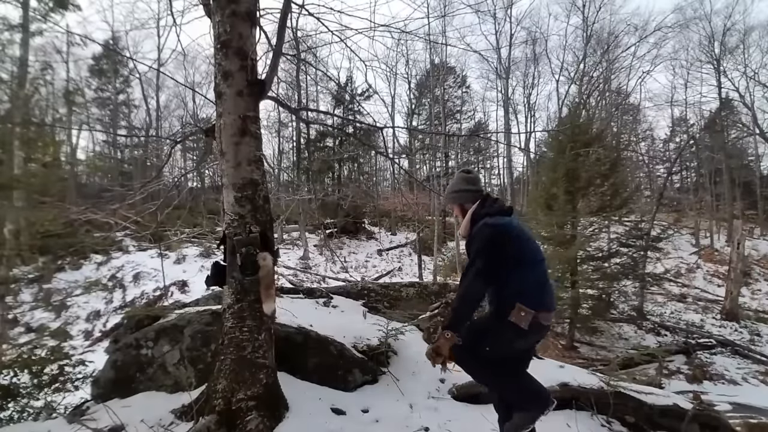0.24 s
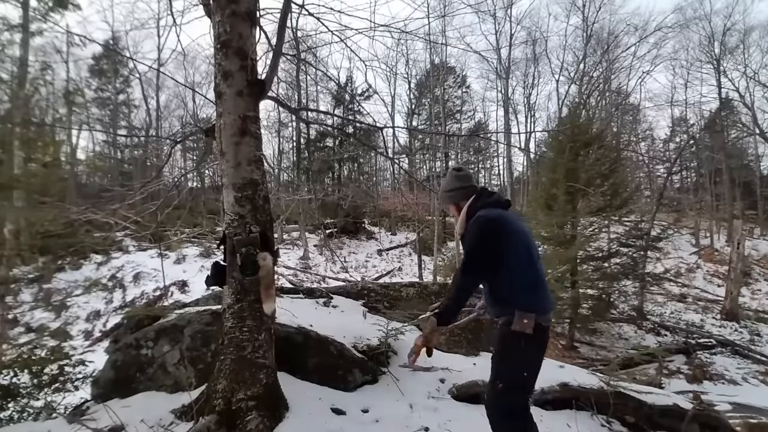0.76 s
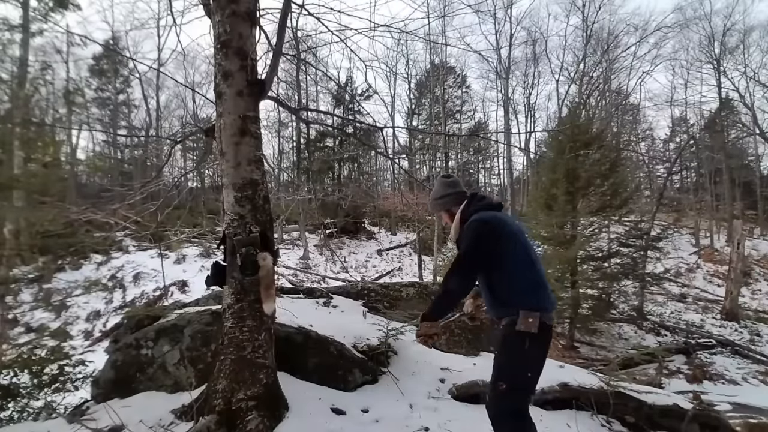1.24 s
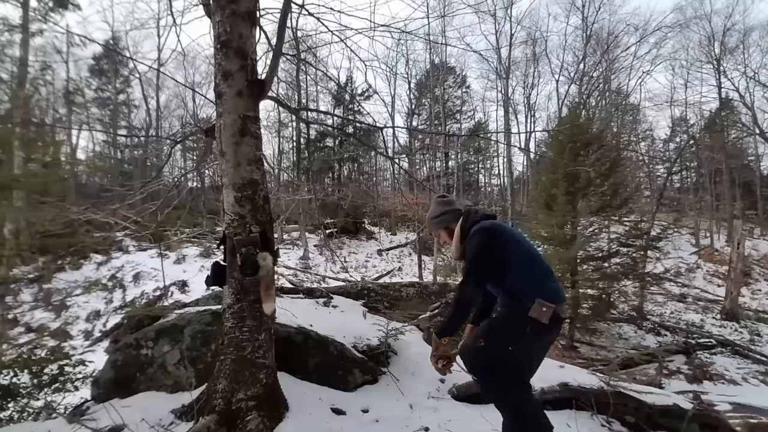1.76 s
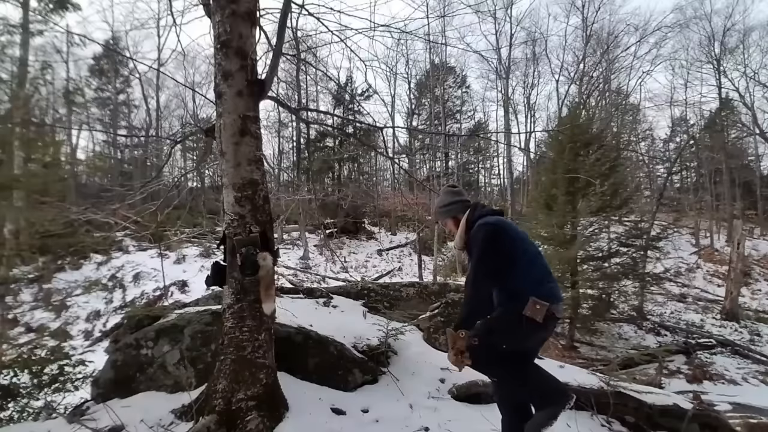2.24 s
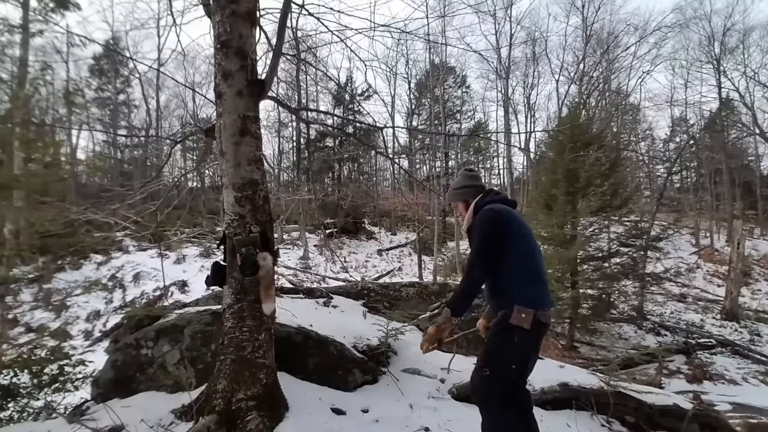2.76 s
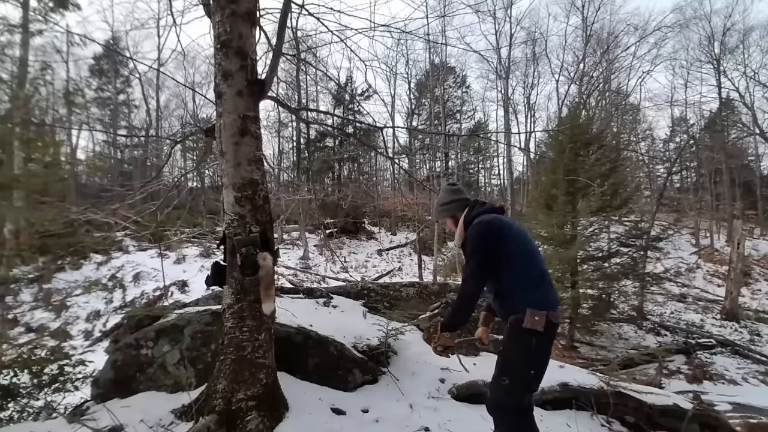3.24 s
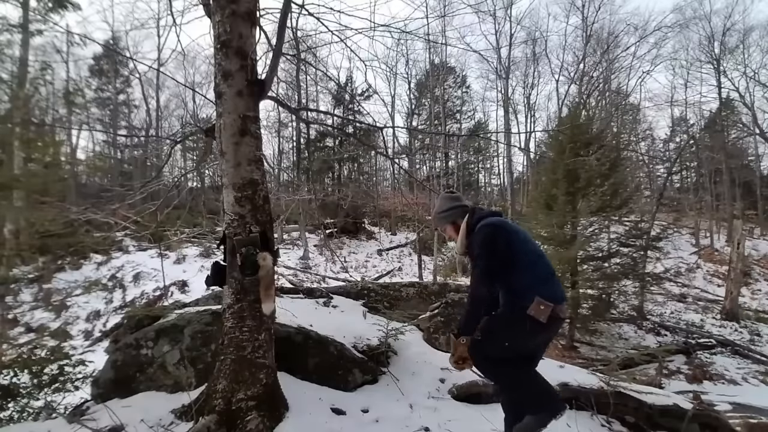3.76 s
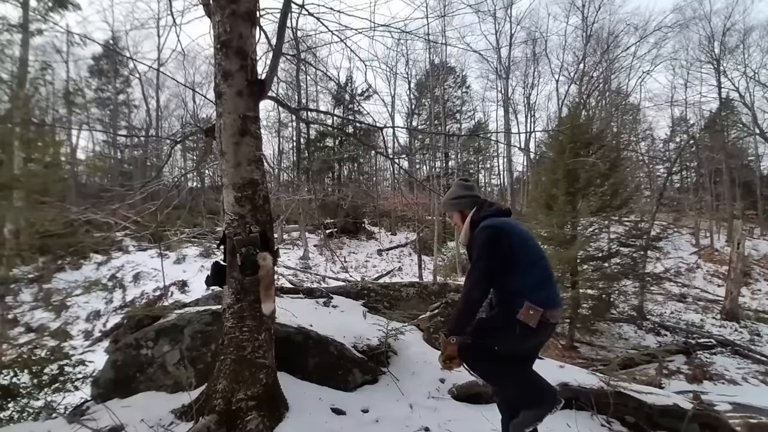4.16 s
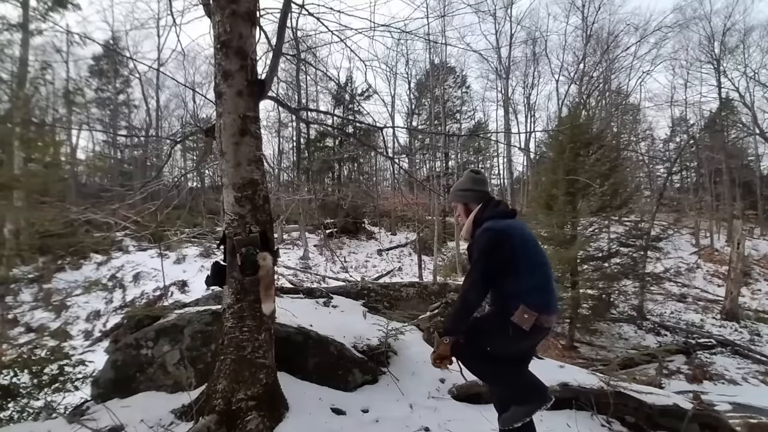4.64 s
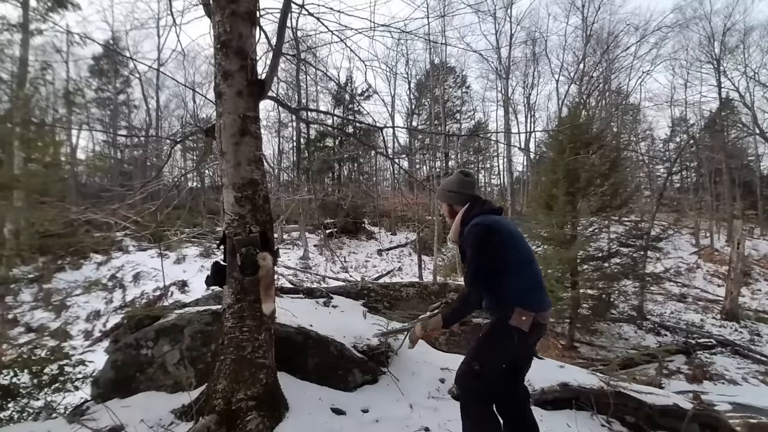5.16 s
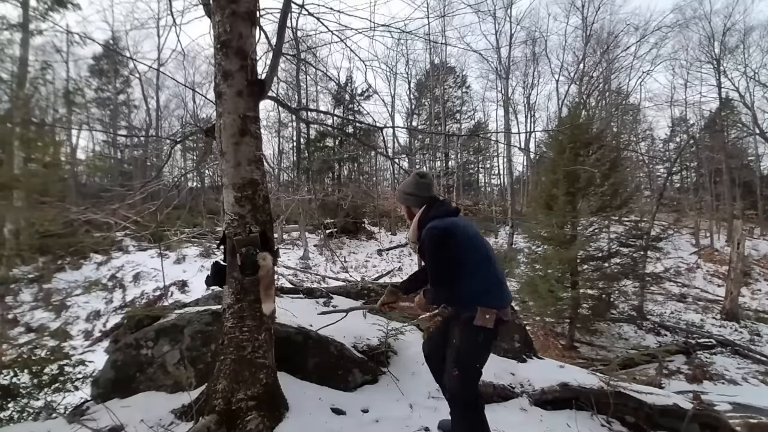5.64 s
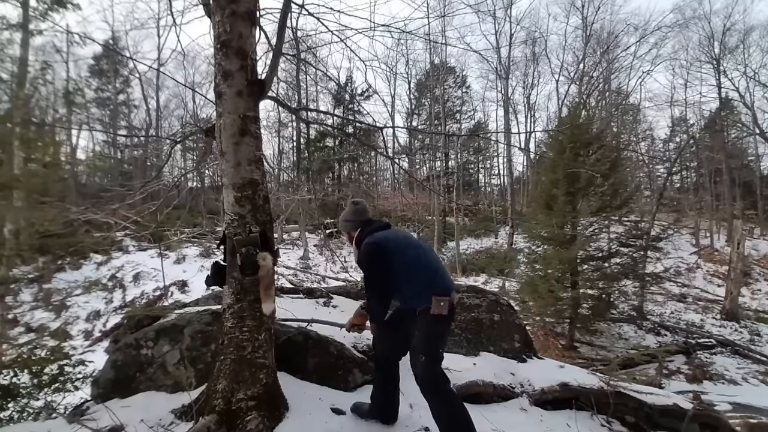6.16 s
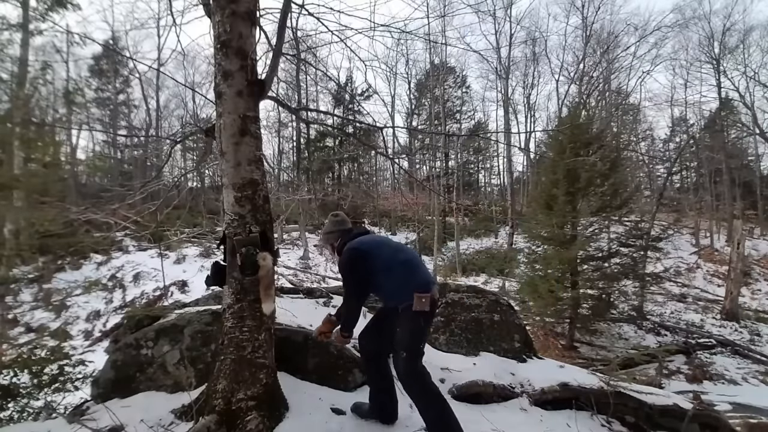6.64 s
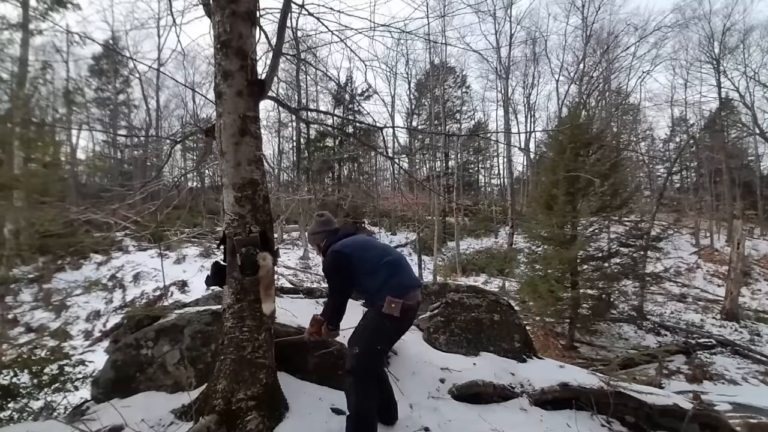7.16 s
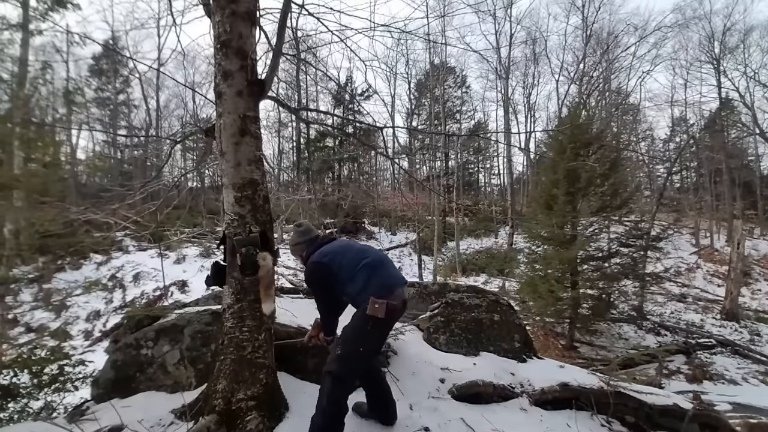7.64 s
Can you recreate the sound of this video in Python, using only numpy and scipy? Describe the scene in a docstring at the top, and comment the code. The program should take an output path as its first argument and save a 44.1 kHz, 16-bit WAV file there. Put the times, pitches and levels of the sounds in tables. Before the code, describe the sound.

In a quiet snowy wood, someone breaks dry sticks over a knee. A loud, sharp crack comes at once, followed by smaller snaps and a second splintering break. After a lull of faint rustling, boots crunch and thud in crusty snow while twigs click and wood knocks hollowly, with another strong snap near the end. The sounds are close and lean left, with a short echo off the trees.

```python
"""In a snowy wood, someone breaks dry sticks over a knee and shifts about in the crust.
Each crack is a short burst of noise that rings the stick and scatters back off the tree trunks.
Stick ends knock, boots thud, snow crunches in tiny fractures, and a soft air noise lies below.
The left microphone opening (port) is the more open one; the volume dips just ahead of sudden sounds."""
import sys
import numpy as np
from scipy import signal
from scipy.fft import rfft, irfft
from scipy.io import wavfile
from scipy.ndimage import uniform_filter1d

SR = 44100
rng = np.random.default_rng(int(sys.argv[2]) if len(sys.argv) > 2 else 0)


def put_to_file(sound):
    """Save the sound as 16-bit audio at rate SR, in the file named by the first command-line argument."""
    columns = np.atleast_2d(sound).T  # one column per channel
    safe = np.clip(columns, -1, 1)
    whole_steps = np.round(safe * 32767)
    wavfile.write(sys.argv[1], SR, whole_steps.astype(np.int16))


N = 348390

# Sticks and crust breaking: start_s, level_db, pitch_hz, fade_s, ring_db, treble_db
# (a fade is the time to die away by 60 dB; ring and treble are added to the level)
CRACKS = [(0.0227, -15, 1840, 0.043, -42, 1.5), (0.0788, -39.5, 980, 0.065, -15, 10),
          (0.2098, -30, 2570, 0.059, -11, 10.5), (0.2897, -34, 1810, 0.077, -21, 1.5),
          (0.3711, 8.5, 1480, 0.035, -9, -7.5), (0.3801, -4.5, 3670, 0.013, 3.5, -11),
          (0.3906, -10.5, 2390, 0.086, -11, -2), (0.405, -8, 2300, 0.035, -16, -16.5),
          (0.7035, -37.5, 1540, 0.028, -25, -7.5), (1.1214, -15, 1610, 0.056, -2, -22),
          (1.125, -19, 2410, 0.022, 2.5, -21.5), (1.3175, -11.5, 1320, 0.014, 3, -1),
          (1.508, -33.5, 2460, .06, -20, -12), (2.2314, -23.5, 1460, 0.025, -11.5, 0),
          (2.2533, -32, 1010, .06, -16, -4), (2.298, -35, 1380, 0.031, -15, -7),
          (2.3191, -41, 1590, 0.03, -14, -1), (2.3344, -21.5, 2430, 0.039, -25, -5.5),
          (2.3498, -8, 1450, 0.022, -3.5, -13), (2.353, -7.5, 1320, 0.033, -3.5, -6),
          (2.37, -6.5, 3450, 0.065, -1, -0.5), (2.3801, -14, 4060, 0.14, -3.5, 2.5),
          (2.4007, -23, 2440, 0.032, -1, 2.5), (2.7335, -51, 4480, 0.087, -1.5, 2.5),
          (2.7587, -44.5, 1500, 0.04, -7.5, -9.5), (2.8652, -42.5, 2830, 0.029, -5.5, -14),
          (3.079, -20.5, 1760, 0.025, -10.5, -22), (3.1027, -13, 1650, 0.052, -8.5, -19),
          (3.152, -19.5, 2100, 0.015, -21, -7), (3.2052, -33, 1590, .041, -25, -7),
          (3.2832, -39, 1070, 0.081, 7.5, -28), (3.306, -31.5, 1480, 0.2, -7, -11),
          (3.352, -38.5, 1920, 0.03, -2, -7), (3.5504, -35.5, 983, .095, -2, -7.5),
          (3.87, -46.5, 1245, .077, -2, -6), (5.0276, -34, 1530, 0.05, 0.5, -6),
          (5.059, -37.5, 1630, 0.11, -5, -4), (5.862, -41, 1460, 0.027, -1, -4),
          (5.8733, -35, 1500, 0.076, -1.5, -18), (5.9367, -24.5, 2110, 0.033, -14, -4.5),
          (6.0018, -34, 1140, 0.12, -21, -10.5), (6.091, -29, 1920, .11, -6, -3.5),
          (6.1008, -29, 1660, 0.14, -6, -18), (6.237, -25, 1370, 0.045, -2.5, -10.5),
          (6.2677, -35, 1420, 0.026, -26, 1), (6.314, -35, 1530, 0.16, 0.5, -10),
          (6.328, -34.5, 1070, 0.087, -2, -3), (6.591, -29, 1390, 0.16, -16, -11),
          (6.605, -20.5, 2320, 0.11, -12, -9), (6.6384, -28, 2580, 0.054, -13, -16),
          (6.6495, -19.5, 2650, 0.018, -18, -6), (6.6723, -19.5, 3320, 0.034, -24, -6),
          (6.8018, -35.5, 1350, 0.26, -6.5, -7), (6.9, -25.5, 1700, 0.06, -8, -10.5),
          (6.9069, -14.5, 1870, 0.034, -6, -8), (7.012, -24.5, 1420, 0.061, -6, -4.5),
          (7.0585, -18.5, 1480, 0.049, -9.5, -9), (7.0979, -20.5, 1430, .06, -4, -7),
          (7.1213, -19.5, 1510, 0.07, -12, -14), (7.1536, -21, 2750, 0.14, -13, -2),
          (7.1818, -3, 2000, 0.023, -10, -2.5), (7.1905, -13, 3130, .06, -4, -2),
          (7.2036, -14.5, 2280, 0.13, -28, -10), (7.4758, -40.5, 1380, 0.031, 5.5, -30),
          (7.5281, -31.5, 1560, 0.18, -10, -2), (7.5458, -28.5, 1310, 0.051, -14, -11),
          (7.663, -32, 1800, 0.26, -13, -2.5)]
# Tone of the broad crack, its sharp edge and the fizz of fine splinters: frequency_hz, level_db
SNAP_TONE = [(290, -29), (500, -4), (1000, 3), (1500, 6.5), (2300, 7.5), (3100, 4), (5000, -2),
             (8000, -25.5)]
EDGE_TONE = [(1800, -41), (3200, -11), (4500, 0.5), (6500, 4.5), (8500, -54.5)]
FIZZ_TONE = [(5000, -31), (7000, 3.5), (8000, -7.5), (9500, 5), (12500, 7.5), (15500, 2.5)]
# Hollow knocks of stick ends and lumps of crust: start_s, level_db, pitch_hz, fade_s
KNOCKS = [(0.37, -32, 870, 0.11), (0.434, -28, 750, .18), (0.469, -30.5, 665, 0.089),
          (0.703, -44.5, 560, 0.02), (0.82, -52.5, 305, 0.03), (0.936, -44.5, 640, 0.023),
          (1.155, -37.5, 447, 0.064), (1.184, -40.5, 785, 0.27), (1.316, -19, 652, 0.047),
          (1.586, -41.5, 675, 0.042), (1.683, -42, 600, .045), (1.775, -39.5, 590, 0.062),
          (2.124, -42, 660, 0.036), (2.353, -20.5, 684, 0.038), (2.379, -20.5, 800, 0.045),
          (2.422, -17, 616, 0.035), (2.478, -32, 686, 0.1), (2.564, -40.5, 556, 0.037),
          (2.757, -49, 564, 0.048), (3.08, -33, 940, 0.096), (3.102, -26, 810, .17),
          (3.283, -25, 386, 0.091), (3.56, -35.5, 444, 0.079), (5.03, -40.5, 780, .15),
          (5.244, -43, 730, .065), (5.619, -37.5, 615, .045), (5.652, -37, 630, 0.038),
          (5.687, -37, 610, 0.22), (5.717, -33.5, 610, 0.15), (5.75, -36, 695, .1),
          (5.908, -37.5, 440, .055), (6.328, -33.5, 506, 0.029), (6.377, -35, 506, 0.093),
          (6.606, -38.5, 694, 0.18), (6.907, -30, 780, 0.13), (7.061, -33, 630, 0.046),
          (7.183, -29.5, 390, 0.39), (7.579, -45, 477, .07), (7.665, -37.5, 385, 0.26)]
# Boots and knee landing: start_s, level_db, pitch_hz
THUDS = [(0.369, -19, 218.6), (0.823, -45, 125), (1.12, -31, 283), (2.369, -28.5, 269), (2.948, -39.5, 146),
         (3.101, -39, 253.2), (5.375, -29.5, 97), (6.001, -30.5, 111), (6.023, -32, 127), (6.059, -34, 132),
         (6.106, -31.5, 177), (6.772, -37, 169), (6.912, -37.5, 199), (7.172, -26.5, 108),
         (7.189, -26, 163), (7.667, -44, 140), (7.704, -34.5, 140)]
# How much the body shifts in the crust: time_s, rustle_db, crunch_db
MOVEMENT = [(0.0, -60, -48), (0.1, -67, -63), (0.29, -64, -82), (0.55, -57.5, -45), (0.7, -60, -45.5),
            (0.911, -70, -47), (1.3, -63.5, -68.5), (1.609, -67.5, -58.5), (1.891, -58.5, -49.5),
            (2.06, -62, -53), (2.27, -65, -75), (2.6, -66, -57.5), (2.999, -65, -54), (3.202, -58.5, -57),
            (3.33, -65, -47), (3.45, -62.5, -54.5), (3.65, -66, -52.5), (3.8, -67.5, -60.5),
            (3.88, -62.5, -55), (4.0, -66.5, -60.5), (4.37, -68.5, -67), (4.8, -70, -62.5),
            (5.05, -58.5, -51), (5.36, -65.5, -58.5), (5.52, -68, -56.5), (5.6, -62, -53.5),
            (5.72, -62.5, -49), (5.98, -67.5, -51.5), (6.2, -59, -47), (6.58, -65.5, -54.5),
            (6.86, -59.5, -49), (7.0, -61, -51), (7.34, -55, -52), (7.55, -62.5, -57.5), (7.71, -51.5, -48),
            (7.9, -61, -77)]
# Showers of splinters and crust after big breaks: start_s, hold_s, rustle_db, crunch_db, air_db
SHOWERS = [(0.421, 0.036, -45, -36.5, -54.5), (1.17, 0.043, -52, -69, -51.5),
           (2.366, 0.049, -33.5, -46, -47.5), (7.087, 0.22, -51, -46, -47.5)]
# The background sinks after the loudest breaks, then returns: start_s, end_s, depth_db
HUSHES = [(0.511, 1.126, 14.5), (2.51, 3.112, 12.5), (7.32, 7.72, 6)]
# Tone of rustling crust and clothes, packing snow, tiny fractures and air: frequency_hz, level_db
RUSTLE_TONE = [(530, -41.5), (900, -15.5), (1450, -10), (2950, -6), (5270, -14.5), (6500, -15), (8150, -26),
               (9660, -14.5), (12900, -11), (15500, -15.5)]
CRUNCH_TONE = [(150, -16), (350, -8), (650, -2), (1200, -7.5), (1700, -5.5), (2500, -15), (6000, -33.5)]
GRIT_TONE = [(500, -21), (1000, -5), (1500, -0.5), (2300, -4.5), (3500, -9.5), (6500, -23.5), (9000, -41)]
AIR_TONE = [(13, -35.5), (22, -24), (27, -22.5), (107, -0.5), (237, -0.5), (446, -7.5), (825, -14),
            (1590, -9.5), (2010, -24.5), (2500, -26), (3250, -56.5), (5500, -120)]
# How alike sound from all around is at the two ports: frequency_hz, likeness (0 means unrelated)
LIKENESS = [(60, 0.15), (130, 1.6), (290, 1.9), (640, 0.13), (1410, 3.82), (3100, -3), (6820, -1.8),
            (15000, 0.03)]
# How much louder the left port is than the right: frequency_hz, difference_db
LEFT_OVER_RIGHT = [(60, 3.5), (110, 9), (200, 9.5), (380, 9.5), (700, 6.5), (1290, 4), (2380, 7.5),
                   (4400, 14.5), (8120, 5), (15000, 19)]

CRACK_RISE_S, FIRST_BREAK_FADE_S, THUD_FADE_S = 0.0006, 0.012, 0.099
TRUNKS_FADE_S, TRUNKS_DB = 0.15, -8.5
FAR_WOOD_FADE_S, FAR_WOOD_DB = 0.75, -26
SHOWER_RISE_DB_PER_S, SHOWER_FALL_DB_PER_S = 700.5, 270
HUSH_SINK_S, HUSH_RETURN_S = 0.056, 0.048
AIR_DB = -51.5
STICK_LAG_S, GROUND_LAG_S = 0.00017, 0.00027   # how much later the right port hears them


def stick_cracks():
    """Fibres let go in an uneven, dying burst that rings the stick; splinters differ at each port."""
    rings, snap, edge, fizz = np.zeros((4, 2, N))
    t = np.arange(int(.25 * SR)) / SR
    for start_s, level_db, pitch_hz, fade_s, ring_db, treble_db in CRACKS:
        shared, left, right, lumps = rng.standard_normal((4, len(t)))
        uneven = amp(4 * np.interp(t * 500, np.arange(len(t)), lumps))   # a new level every 2 ms
        splinters = (shared + 3.5 * np.array([left, right])) * uneven * fade(t, fade_s)
        first_break = shared * fade(t, FIRST_BREAK_FADE_S)
        burst = (first_break + 1.5 * splinters) * np.minimum(t / CRACK_RISE_S, 1)
        burst *= amp(level_db) / np.abs(burst).max()
        ring = band(burst, pitch_hz / 1.17, pitch_hz * 1.193)
        add(rings, start_s, amp(level_db + ring_db) * ring)
        add(snap, start_s, burst)
        add(edge, start_s, amp(-7.5 + .5 * treble_db) * burst)   # the edge partly follows the treble
        add(fizz, start_s, amp(treble_db) * burst)
    bursts = np.zeros((2, N))
    for layer, tone in (snap, SNAP_TONE), (edge, EDGE_TONE), (fizz, FIZZ_TONE):
        bursts += [shape_tone(port, lambda hz: at_hz(tone, hz)) for port in layer]
    return rings, bursts


def bumps(table, width, push_s, contact):
    """A sharp first contact and a short push of noise ring an object around one pitch."""
    out, t = np.zeros(N), np.arange(int(.3 * SR)) / SR
    for start_s, level_db, pitch_hz, fade_s in table:
        push = rng.standard_normal(len(t)) * fade(t, min(fade_s, .3)) * np.minimum(t / push_s, 1)
        push[0] = contact
        add(out, start_s, amp(level_db) * band(push, pitch_hz / width, pitch_hz * width))
    return out


def hollow_knocks():
    """Stick ends and lumps of crust knock and ring in a narrow band of pitches."""
    return bumps(KNOCKS, width=1.243, push_s=0.0011, contact=7.7)


def boot_thuds():
    """Boots and a knee land with a low bump; the deepest bass is cut."""
    thuds = bumps([(*row, THUD_FADE_S) for row in THUDS], width=1.57, push_s=0.00041, contact=3.5)
    return signal.sosfilt(signal.butter(2, 75, "high", fs=SR, output="sos"), thuds)


def tree_echoes(sound):
    """Sound bounces off near trunks and rocks, then a dull wash comes back from the far wood."""
    t = np.arange(int(.9 * SR)) / SR
    echoes = rng.standard_normal((2, len(t))) * fade(t, TRUNKS_FADE_S) * np.minimum(t / 0.013, 1)
    echoes /= np.sqrt(np.sum(echoes ** 2, axis=1, keepdims=True))
    near = amp(TRUNKS_DB) * signal.oaconvolve(sound[None], echoes, axes=1)[:, :N]
    # countless far echoes blur into noise that carries the dying energy of each crack
    tail = fade(t, FAR_WOOD_FADE_S) ** 2 * np.minimum(t / 0.024, 1)
    energy = np.abs(signal.oaconvolve(sound ** 2, tail / tail.sum())[:N])
    dull = signal.butter(1, [1200, 3800], "band", fs=SR, output="sos")
    wash = unit_level(signal.sosfilt(dull, rng.standard_normal((2, N))))
    return near + amp(FAR_WOOD_DB) * np.sqrt(energy) * wash


def fractures(per_s, spread_db, hiss):
    """Tiny fractures make random clicks of uneven size over a smooth hiss."""
    sizes = amp(spread_db * np.minimum(rng.exponential(1, N), 4)) * rng.choice([-1, 1], N)
    clicks = sizes * (rng.random(N) < per_s / SR)
    return unit_level(clicks) + hiss * rng.standard_normal(N)


def snow_and_air():
    """Crust and clothes rustle, snow packs underfoot with a duller crunch, and the air noise wavers."""
    rustle_db, crunch_db, air_db = background_levels()
    air = amp(air_db + 2 * drift(37)) * all_around(AIR_TONE, lambda: rng.standard_normal(N))
    rustle_gain = amp(rustle_db + 1.8 * drift(60))
    rustle = rustle_gain * all_around(RUSTLE_TONE, lambda: fractures(1300, spread_db=3, hiss=2.3))
    crunch_gain = amp(crunch_db + 2 * drift(50))
    crunch = crunch_gain * all_around(CRUNCH_TONE, lambda: fractures(250, spread_db=-.5, hiss=.73))
    grit_gain = amp(rustle_db - 4 + 3.5 * drift(30))   # clumps of fractures wherever the crust rustles
    grit = grit_gain * all_around(GRIT_TONE, lambda: fractures(400, spread_db=2, hiss=1))
    return air + rustle + crunch + grit


def background_levels():
    """Rustle, crunch and air levels in dB: movement and steady air, hushed at times, plus showers."""
    t = np.arange(N) / SR
    time_s, rustle_db, crunch_db = np.transpose(MOVEMENT)
    levels_db = np.array([np.interp(t, time_s, rustle_db), np.interp(t, time_s, crunch_db),
                          np.full(N, AIR_DB)])
    for start_s, end_s, depth_db in HUSHES:
        corners_s = [start_s - HUSH_SINK_S, start_s, end_s - HUSH_RETURN_S, end_s]
        levels_db -= np.interp(t, corners_s, [0, depth_db, depth_db, 0])
    power = amp(levels_db) ** 2
    for start_s, hold_s, *top_db in SHOWERS:
        before_db = SHOWER_RISE_DB_PER_S * np.maximum(start_s - t, 0)
        after_db = SHOWER_FALL_DB_PER_S * np.maximum(t - start_s - hold_s, 0)
        power += amp(np.array(top_db)[:, None] - before_db - after_db) ** 2
    return 10 * np.log10(power)


def all_around(tone, make_noise):
    """Noise from all sides: the two ports hear it more alike at some pitches than at others."""
    alike = lambda hz: np.clip(at_hz(LIKENESS, hz), -.9, .95)
    mid = shape_tone(make_noise(), lambda hz: at_hz(tone, hz) + 10 * np.log10(1 + alike(hz)))
    side = shape_tone(make_noise(), lambda hz: at_hz(tone, hz) + 10 * np.log10(1 - alike(hz)))
    return np.array([mid + side, mid - side]) / np.sqrt(np.mean(mid ** 2))


def amp(db):
    """Turn decibels into a number to multiply by."""
    return 10 ** (np.asarray(db) / 20)


def fade(t, fade_s):
    """A curve that falls by 60 dB every fade_s seconds."""
    return amp(-60 * t / fade_s)


def unit_level(x):
    """Scale a sound so its average power is 1."""
    return x / np.sqrt(np.mean(x ** 2) + 1e-20)


def at_hz(table, hz):
    """Read between a table's rows, with octaves evenly spaced."""
    row_hz, values = np.transpose(table)
    return np.interp(np.log(hz + 1), np.log(row_hz + 1), values)


def shape_tone(x, gain_db, size=2048):
    """Turn each frequency up or down by gain_db(hz), with no ringing ahead of a hit (minimum phase)."""
    cepstrum = irfft(gain_db(np.arange(size // 2 + 1) * SR / size) * np.log(10) / 20)
    cepstrum[1:size // 2] *= 2
    kernel = irfft(np.exp(rfft(cepstrum[:size // 2], size)))
    return signal.oaconvolve(x, kernel)[:len(x)]


def band(x, low_hz, high_hz):
    """Keep one band of frequencies and scale its peak to 1."""
    out = signal.sosfilt(signal.butter(2, [low_hz, high_hz], "band", fs=SR, output="sos"), x)
    return out / np.abs(out).max()


def drift(per_s):
    """Glide to a new random value per_s times a second."""
    values = rng.standard_normal(int(N / SR * per_s) + 2)
    return np.interp(np.arange(N) / SR * per_s, np.arange(len(values)), values)


def delay(x, lag_s):
    """Make a sound arrive a little later."""
    return np.interp(np.arange(N) - lag_s * SR, np.arange(N), x)


def add(track, start_s, piece):
    """Mix a short sound into a track."""
    i = round(start_s * SR)
    track[..., i:i + piece.shape[-1]] += piece[..., :N - i]


def scene():
    """Mix sticks, echoes and ground sounds; near sounds reach the left port first."""
    rings, bursts = stick_cracks()
    ringing = rings + hollow_knocks()
    sticks = bursts + ringing
    sticks[1] = amp(-0.5) * delay(sticks[1], STICK_LAG_S)
    ground = boot_thuds() + snow_and_air()
    ground[1] = delay(ground[1], GROUND_LAG_S)
    # the sticks ring towards the listener; mostly the broad crack fills the wood
    return sticks + tree_echoes(bursts[0] + .3 * ringing[0]) + ground


def record(dry):
    """Unequal ports colour the sound, the volume dips before hits, peaks clip and top treble is cut."""
    left_db = lambda hz: 6 - 20 * np.log10(1 + amp(-at_hz(LEFT_OVER_RIGHT, hz)))
    right_db = lambda hz: left_db(hz) - at_hz(LEFT_OVER_RIGHT, hz)
    ports = np.array([shape_tone(dry[0], left_db), shape_tone(dry[1], right_db)])
    power = uniform_filter1d(np.mean(ports ** 2, axis=0), size=130)
    level_db = 10 * np.log10(power + 1e-9)
    ahead = 440   # samples, about 10 ms
    rise_db = np.r_[level_db[ahead:], np.full(ahead, level_db[-1])] - level_db
    dip_db = -.6 * uniform_filter1d(np.clip(rise_db - 14, 0, 25), size=90)   # only rises over 14 dB
    dip_db = np.r_[dip_db[ahead // 3:], np.zeros(ahead // 3)]   # the volume is back just before the hit
    clipped = np.clip(ports * amp(dip_db), -.93, .93)
    treble_cut = signal.ellip(10, .3, 70, 15900, fs=SR, output="sos")
    return signal.sosfilt(treble_cut, clipped)


dry = scene()
out = record(dry)
put_to_file(out)
```